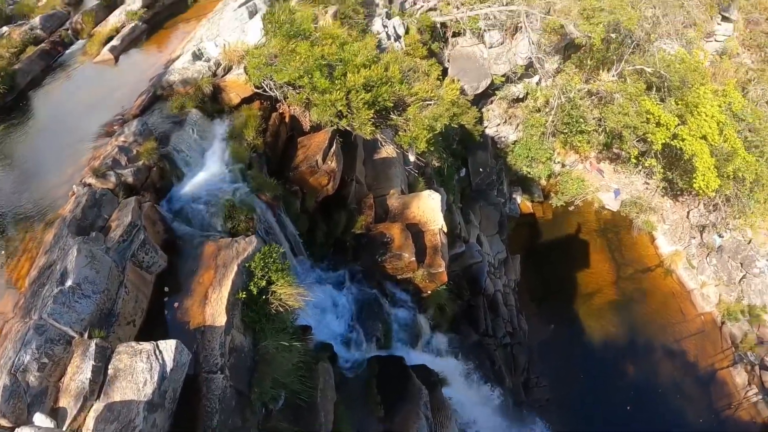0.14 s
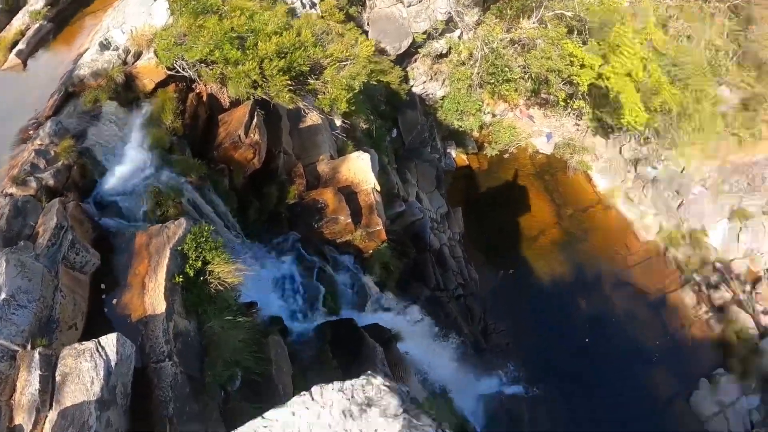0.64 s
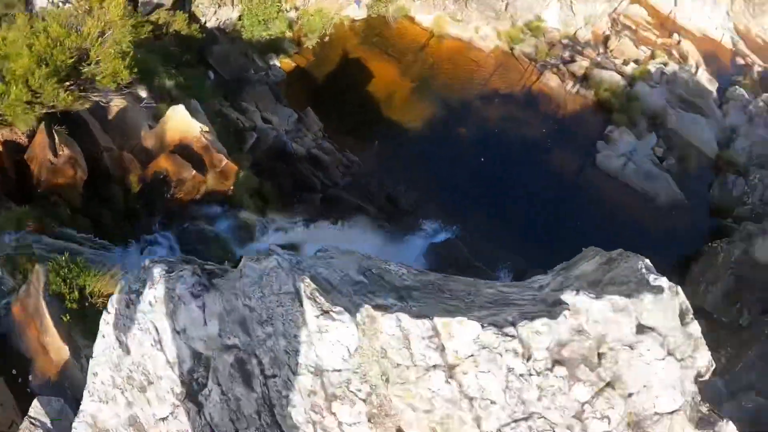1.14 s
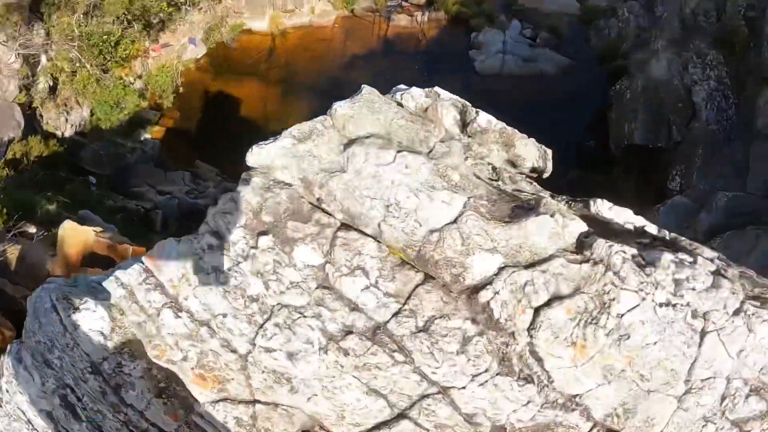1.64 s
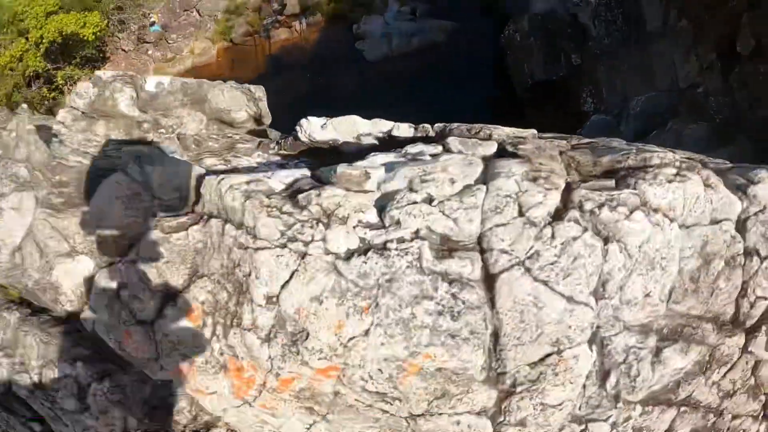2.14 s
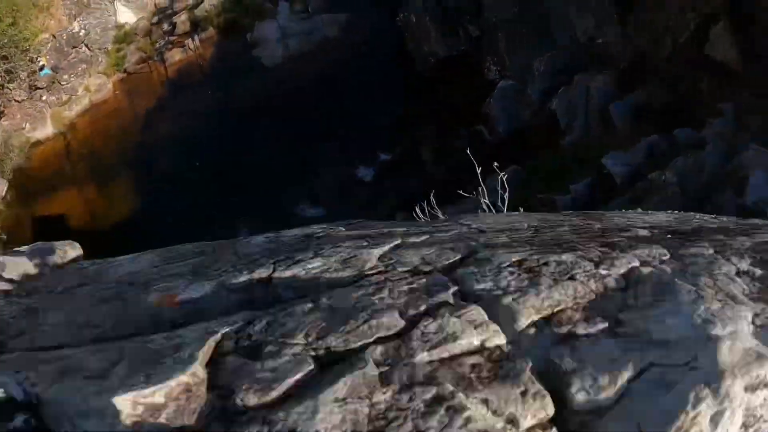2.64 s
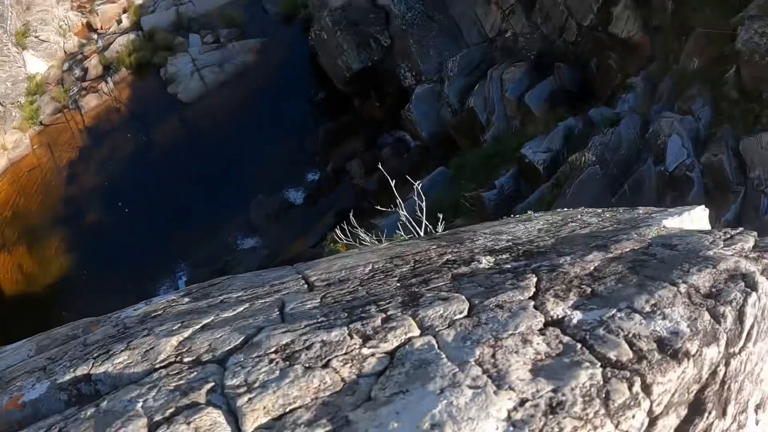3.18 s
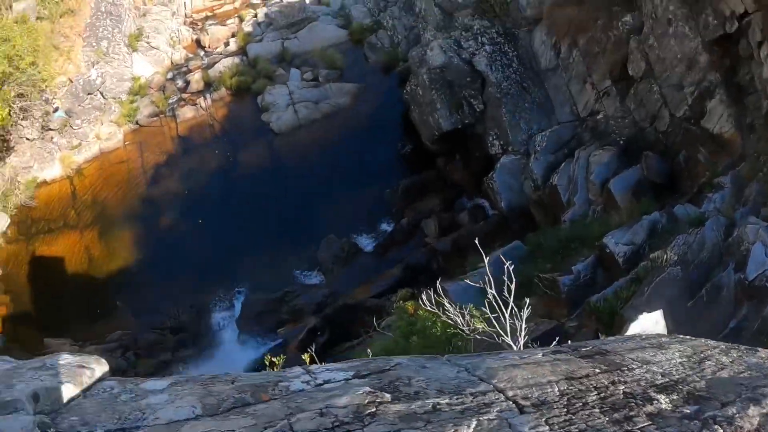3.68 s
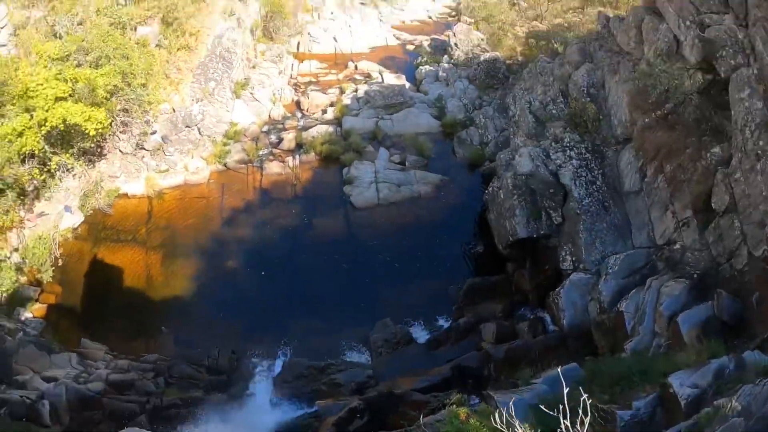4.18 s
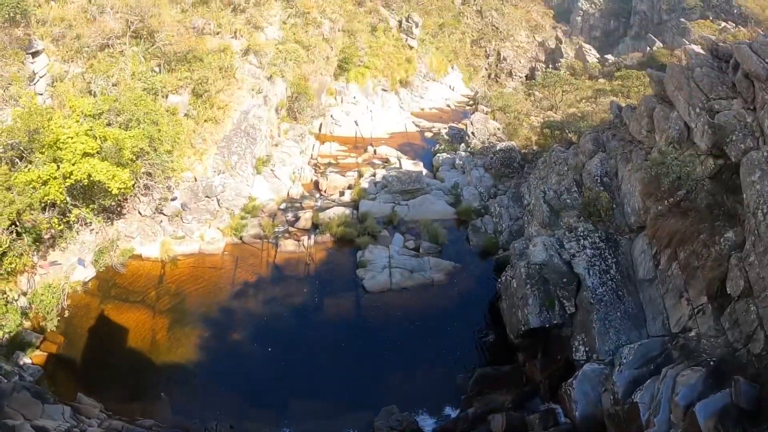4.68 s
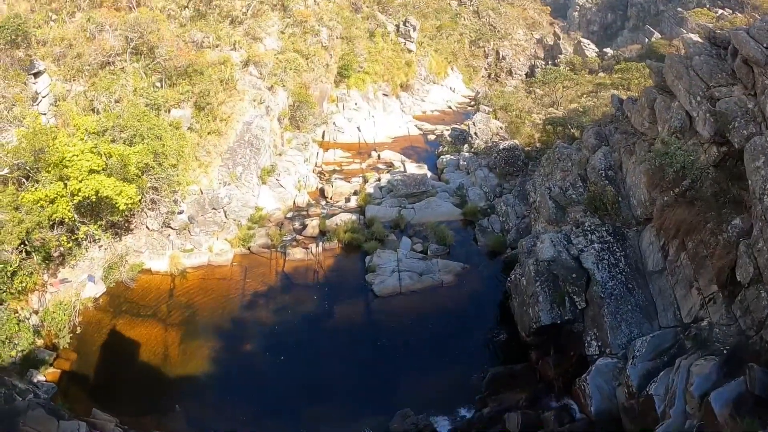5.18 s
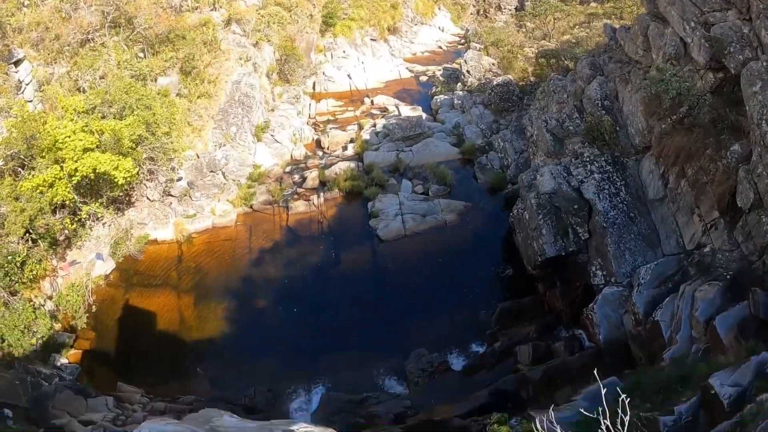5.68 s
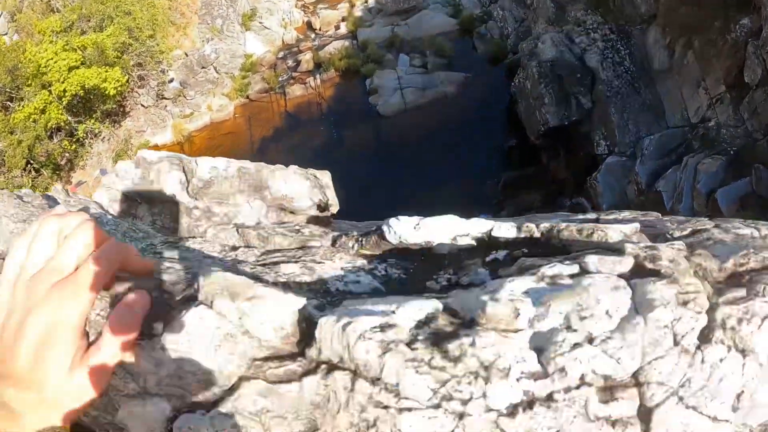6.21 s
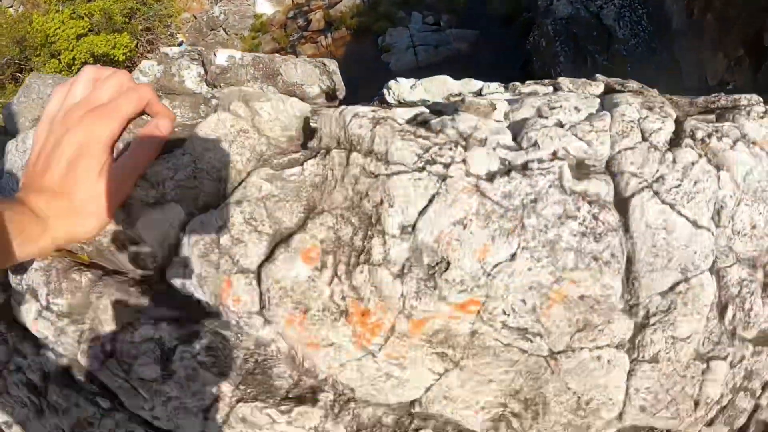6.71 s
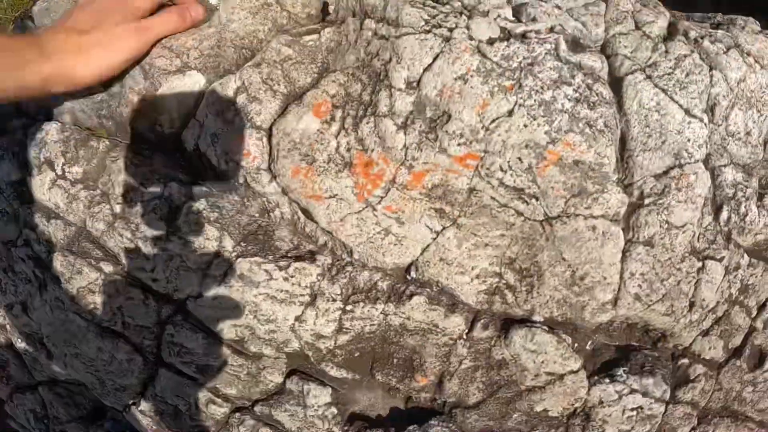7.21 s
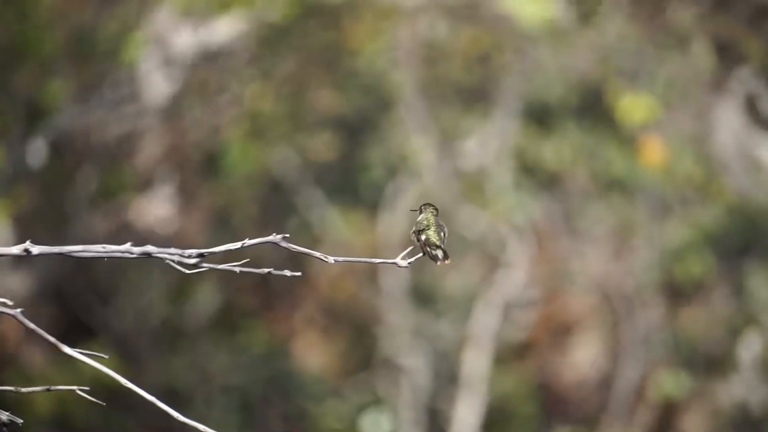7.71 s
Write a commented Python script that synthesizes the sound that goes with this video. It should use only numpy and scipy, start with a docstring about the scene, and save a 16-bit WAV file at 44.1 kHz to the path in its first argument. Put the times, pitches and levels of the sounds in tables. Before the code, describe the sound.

A waterfall hisses below a rock ledge while wind rumbles and a pole-mounted camera knocks on stone, then a cut to windy, rustling bushes.

```python
"""A waterfall hisses through the resonant microphone ports of a small camera swung on a pole along a
rock ledge: filtered noise in bands that surge together and flicker alone. Wind on the housing is low,
gusty noise; knocks of the pole on stone are fading tones with some crunching grit, and loud peaks duck
the gain. Then a hard cut: among bushes, leaf hiss and wind buffeting (both filtered noise) fade in at
another microphone, with short low pops of wind."""
import sys
import numpy as np
from scipy import signal
from scipy.fft import rfft, irfft
from scipy.io import wavfile
from scipy.ndimage import uniform_filter1d

SR = 44100
rng = np.random.default_rng(int(sys.argv[2]) if len(sys.argv) > 2 else 0)


def volts_from_decibels(level):
    """Turn decibel levels (scalar or array-like) into linear amplitude factors."""
    exponent = np.asarray(level, float) / 20
    return 10 ** exponent


def store_pcm(level_fs):
    """Save levels as 16-bit WAV."""
    pcm = np.round(np.clip(level_fs, -1, 1) * 32767).astype(np.int16)
    wavfile.write(sys.argv[1], SR, np.atleast_2d(pcm).T)


N = 345744
T = np.arange(N) / SR  # time of each sample [s]
FREQ = np.fft.rfftfreq(N, 1 / SR) + 1e-3  # frequency of each spectrum bin [Hz], kept above 0 for the log
CUT_S = 7.486  # the ledge ends and the bushes begin

# The hiss swells and sinks as the camera turns; after the hard blow at 5.14 s the gain sinks too:
# (time [s], hiss level before band tilt and flicker [dB])
FALLS_LEVEL = [(0, -36), (.29, -39), (.54, -41.5), (.95, -37), (1.25, -37.5), (1.53, -42), (2.0, -43.5),
               (2.4, -47.5), (2.9, -42.5), (3.3, -43.5), (3.8, -41), (4.05, -41.5), (4.45, -39.5),
               (4.76, -40.5), (5.12, -40.5), (5.2, -44), (5.45, -46), (5.76, -42), (6.05, -47),
               (7.44, -46.5)]
# Tone of the falls, left plus right, before the port peaks: (frequency [Hz], relative level [dB])
FALLS_MID_TONE = [(180, -42), (300, -6.5), (756, -15.5), (1560, -5.5), (2000, -9), (3230, -5.5),
                  (3510, -6.5), (3940, 1), (4350, -5), (4720, -2.5), (5130, -6.5), (6460, -10), (8140, -21),
                  (12100, -43), (15500, -57)]
# Tone of the falls, left minus right: (frequency [Hz], relative level [dB])
FALLS_SIDE_TONE = [(88, -49), (150, -14), (509, -9.5), (643, -16.5), (930, -2), (1270, -9), (2180, -0.5),
                   (3220, 1.5), (3980, -4), (5440, -12), (6470, -27.5), (7130, -57), (9360, -33),
                   (12800, -42), (15500, -69)]
SIDE_DB = -8  # strength of left minus right against left plus right
# Resonances of the microphone ports: (frequency [Hz], width [Hz], boost [dB])
PORT_PEAKS = [(1340, 110, 5.5), (1577, 96, 6.5), (3227, 360, 4.5), (4050, 430, 4.5), (4714, 270, 5.5),
              (5500, 390, 4), (6270, 590, 4)]
# What left minus right shares with the sum: (frequency [Hz], share [0-1], phase lead [rad])
PORT_LINK = [(170, .5, 0), (700, .1, -.3), (1100, .5, -.8), (1550, .55, -1.1), (1900, .1, -1.3),
             (2400, .85, -.6), (2900, .82, -1.4), (3400, .7, -.4), (3800, .3, -.5), (3950, .5, -3.3),
             (5400, .88, -3.1), (6900, 0, -3.1)]
# How each band follows the level and the view:
# (band centre [Hz], share of low wash [factor], share of spray [factor])
TILT_BANDS = [(554, 1.7, 0), (1100, 1.5, 0.65), (1590, 0.56, 0), (2600, 1.04, 0), (3870, 0, 0),
              (4840, 0.34, 1.35), (6360, 0, 1.38), (9700, 0.24, 0.62)]
# The low wash changes less than the hiss as the level leaves FACING_DB, by this share
FACING_DB, WASH_PER_DB = -41, 0.4857
# Open view of the spray: (time [s], boost before the band shares [dB])
SPRAY_VIEW = [(0, 1), (3.3, 1.5), (4.4, 5), (5.7, 3.5), (6.5, 0.8), (7.4, 0.5)]

# Wind on the housing: (time [s], rumble level before gusts [dB])
WIND_LEVEL = [(0, -39), (.2, -34), (.42, -42), (1.1, -39), (1.45, -39.5), (1.76, -36.5), (2.3, -37.5),
              (2.72, -27.5), (3.3, -34.5), (3.9, -32), (4.06, -36.5), (4.5, -33), (5.3, -38), (5.7, -43.5),
              (5.88, -38), (6.2, -41.5), (6.8, -39), (7.1, -40), (7.46, -40.5)]
# Tone of the wind rumble: (frequency [Hz], relative level [dB])
RUMBLE_TONE = [(8.8, -34.5), (15, 2), (27, 2.5), (41, 1), (57, -4.5), (81, -23.5), (130, -29), (170, -55),
               (290, -120)]
# Tone of the housing flutter: (frequency [Hz], relative level [dB])
FLUTTER_TONE = [(53, -39), (90, 0), (135, -6.5), (177, -6), (225, -7.5), (659, -32), (700, -25), (910, -38),
                (1540, -120)]
# Flutter level when the rumble is at BREEZE_DB, and the dB it gains per dB of rumble
FLUTTER_DB, BREEZE_DB, FLUTTER_PER_DB = -53.5, -39, .3
# The grip shifts on the pole and the housing flutters more:
# (time [s], spread to each side [s], flutter level before gusts [dB])
GRIP_SHIFTS = [(1.98, 0.28, -53), (4.5, 0.12, -46.5), (5.148, 0.097, -38), (6.05, 0.29, -47),
               (6.6, 0.19, -47), (7.3, 0.28, -48.5)]

# Blows on the stone, strengths before the contact softens them:
# (time [s], shell [dB], mount [dB], pole [dB], contact spread [ms])
KNOCKS = [(0.1264, -19.5, -24, -20, 0.27), (.156, -18, -9.5, -10.5, 0.23), (0.2319, -20, -12.5, -13, 0.51),
          (0.29, -47, -40, -41, 0.85), (.412, -37, -42, -26.5, 0.71), (2.021, -24, -34, -29, 0.41),
          (2.025, -22, -26.5, -17.5, 0.79), (5.0584, -34, -20, -22.5, 0.35), (5.085, -33, -35, -39, 0.19),
          (5.142, -2, -28.5, -17, 0.19), (5.16, -15.5, -11.5, -13, 0.11), (5.199, -20, -17.5, -14.5, 1),
          (5.296, -49, -37, -38, 0.64), (5.9308, -6.5, -21, -20, 0.53), (5.962, -32, -30.5, -27, 0.46),
          (6.5383, -13.5, -31, -29, 0.41), (6.554, -40, -27.5, -33, 0.23), (6.571, -33, -46, -38, 0.41),
          (6.879, -40.5, -45, -34, 0.85), (7.154, -34, -37, -35, .2), (7.166, -21.5, -55, -45, 0.42),
          (7.172, -19.5, -39, -38, 0.78), (7.196, -36, -36, -27, 0.23), (7.383, -40, -47, -48, 0.12)]
# Ringing tones of the shell: (frequency [Hz], relative level [dB], time to fall 60 dB [s])
SHELL_MODES = [(264.7, 6, 0.069), (463, -14, 0.023), (503, 3, 0.031), (804, -7.5, 0.02), (1060, -3, 0.036),
               (1237, -2.5, 0.026), (1570, -36, 0.023), (1990, -35, 0.014)]
# Ringing tones of the mount: (frequency [Hz], relative level [dB], time to fall 60 dB [s])
MOUNT_MODES = [(166.3, 1, 0.15), (103, -14, 0.08)]
# Ringing tones of the pole: (frequency [Hz], relative level [dB], time to fall 60 dB [s])
POLE_MODES = [(53.4, 3.5, 0.16), (39.3, -14.5, 0.23), (79.7, -12, 0.34)]
# Some blows land on loose grit: (time [s], crunch level [dB], centre frequency [Hz])
CRUNCHES = [(.1269, -45, 900), (.152, -33, 1050), (2.021, -45, 1100), (5.0586, -43, 800), (5.086, -47, 700),
            (5.142, -23.5, 1340), (5.16, -41, 1200), (5.9316, -35.5, 1500), (6.5384, -43, 1200),
            (7.196, -39, 1100)]
# The pole rebounds once in the hand, slow and deep
HEAVE_S, HEAVE_HZ, HEAVE_DB, HEAVE_T60_S = 5.9455, 33, -7, 0.16
TICK_S, TICK_DB = 3.144, -20.5  # one buckling tick, its level added to that of the tones below
# Ringing tones of the tick: (frequency [Hz], relative level [dB], time to fall 60 dB [s])
BUCKLE_MODES = [(516, -1.5, 0.015), (1136, 1.5, 0.029), (1250, 4.5, 0.021)]

# Tone of the wind buffeting in the bushes: (frequency [Hz], relative level [dB])
BUFFET_TONE = [(24, -73), (40, -56), (64, -14), (90, -11), (172, 4.5), (322, -2.5), (609, -10), (900, -17),
               (1170, -42), (1980, -120)]
# Tone of the leaf hiss: (frequency [Hz], relative level [dB])
LEAF_TONE = [(410, -22), (700, -11.5), (1040, -0.5), (1310, -4), (2020, -6.5), (2190, -7.5), (8210, -12.5),
             (10400, -13), (16000, -21)]
# Which side the leaf hiss leans to: (frequency [Hz], left over right [dB])
LEAF_LEAN = [(60, -3), (110, 1.0), (200, -3), (380, -3), (700, -5), (1290, -5), (2380, -5), (4400, -2.5),
             (8120, 0), (15000, -1)]
# Eddies on both microphone capsules: (time [s], peak of the swing's outline [dB], frequency [Hz])
POPS = [(7.56, -40, 700), (7.564, -35, 250), (7.596, -28.5, 330), (7.615, -34, 220), (7.74, -19, 220),
        (7.799, -21, 300), (7.82, -9.5, 425), (7.831, -13, 300)]
# Buffeting and leaves rise along a power law of time: levels reached FADE_S after the cut;
# a constant faint hiss of still air lies under them
FADE_S, BUFFET_DB, LEAVES_DB, STILL_DB = 0.36, -21, -24.5, -72
BUFFET_DB_PER_DECADE, LEAVES_DB_PER_DECADE = 59, 52.5  # rise for each tenfold time since the cut


def curves(table):
    """Columns of a table after the first, drawn out to one value a sample."""
    s, *columns = np.transpose(table)
    return [np.interp(T, s, c) for c in columns]


def colour(points):
    """Gain at each frequency, joined up from (frequency [Hz], level [dB]) points."""
    hz, db = np.transpose(points)
    return volts_from_decibels(np.interp(np.log(FREQ), np.log(hz), db))


def unit(x):
    """Scale to an average (rms) strength of 1."""
    return x / np.sqrt(np.mean(x ** 2))


def white():
    """Spectrum of fresh white noise, equally strong at all pitches."""
    return rfft(rng.standard_normal(N))


def walk(rate):
    """Random levels held for 1 / rate seconds, smoothed twice and scaled to rms 1."""
    hold = int(SR / rate)
    steps = np.repeat(rng.standard_normal(N // 200), hold)[:N]
    return unit(uniform_filter1d(uniform_filter1d(steps, hold), hold))


def ring(t, modes, rise_s=1e-4):
    """Fading tones set off at t = 0; the swing builds up over about rise_s."""
    t = np.maximum(t, 0)
    swing = sum(volts_from_decibels(db - 60 * t / t60) * np.sin(2 * np.pi * hz * t) for hz, db, t60 in modes)
    return swing * (1 - np.exp(-(t / rise_s) ** 2))


def stereo(mid, side):
    """Left and right from their sum and difference."""
    return np.array([mid + side, mid - side])


def falls():
    """Countless bursting bubbles blur into hiss; its bands surge together and flicker alone."""
    level_db, = curves(FALLS_LEVEL)
    spray_db, = curves(SPRAY_VIEW)
    wash_db = WASH_PER_DB * (FACING_DB - level_db)
    ports = volts_from_decibels(sum(db / (1 + ((FREQ - hz) / width * 2) ** 2) for hz, width, db in PORT_PEAKS))
    noise = white()
    mid = noise * colour(FALLS_MID_TONE) * ports

    # the difference between the ports is part shared noise, part its own
    hz, share, lead = np.transpose(PORT_LINK)
    share = np.clip(np.interp(FREQ, hz, share), 0, 1)
    shared = share * np.exp(1j * np.interp(FREQ, hz, lead)) * noise
    own = np.sqrt(1 - share ** 2) * white()
    side = (shared + own) * colour(FALLS_SIDE_TONE)
    side *= volts_from_decibels(SIDE_DB) * np.linalg.norm(mid) / np.linalg.norm(side)

    scale = 1 / np.std(irfft(mid, N))
    place = np.interp(FREQ, np.transpose(TILT_BANDS)[0], np.arange(len(TILT_BANDS)))
    surge = walk(7)
    out = 0
    for k, (_, wash, spray) in enumerate(TILT_BANDS):
        band = np.clip(1 - abs(place - k), 0, 1)  # overlapping bands that add up to the whole
        # as the hiss sinks, the spray dulls and the low wash of the gorge is left
        tilt_db = wash * wash_db + spray * spray_db
        gain = volts_from_decibels(level_db + tilt_db + 0.5 * surge + 0.5 * walk(12))
        out = out + gain * scale * stereo(irfft(mid * band, N), irfft(side * band, N))
    return out


def wind():
    """Eddies push the whole housing, so both ports move almost alike, the left one a little more."""
    rumble_db, = curves(WIND_LEVEL)
    grips = sum(volts_from_decibels(db) * np.exp(-((T - s) / spread) ** 2) for s, spread, db in GRIP_SHIFTS)
    breeze = volts_from_decibels(FLUTTER_DB + FLUTTER_PER_DB * (rumble_db - BREEZE_DB))
    flutter_gain = np.hypot(breeze, grips)
    gust = walk(14)

    def rumbling():
        """Deep noise that swells with the gusts."""
        return unit(irfft(white() * colour(RUMBLE_TONE), N)) * volts_from_decibels(rumble_db + 2.05 * gust)

    def fluttering():
        """Higher noise that follows the gusts less and also trembles by itself."""
        trembling = volts_from_decibels(1.08 * gust + 2.4 * walk(30))
        return unit(irfft(white() * colour(FLUTTER_TONE), N)) * flutter_gain * trembling

    mid = rumbling() + fluttering()
    side = 0.025 * mid + volts_from_decibels(-29) * rumbling() + volts_from_decibels(-23) * fluttering()
    return stereo(mid, side)


def knocks():
    """Each blow rings shell, mount and pole; a softer contact pushes longer and leaves out high tones."""
    out = np.zeros(N + SR)
    span = np.arange(-SR // 100, SR // 3)  # samples around a blow
    for s, shell_db, mount_db, pole_db, contact_ms in KNOCKS:
        at = int(s * SR) + span
        t = at / SR - s
        body = volts_from_decibels(mount_db) * ring(t, MOUNT_MODES)
        # the pole swings back against the blow, a moment late
        body -= volts_from_decibels(pole_db) * ring(t - 0.002, POLE_MODES)
        # the shell first gives way a little, then springs out
        body -= volts_from_decibels(shell_db) * ring(t + 0.0015, SHELL_MODES, rise_s=0.0022)
        push_ms = np.arange(-200, 201) / SR * 1000
        push = np.exp(-0.5 * (push_ms / contact_ms) ** 2)
        out[at] += signal.fftconvolve(body, push / push.sum(), "same")

    for s, grit_db, hz in CRUNCHES:
        at = int(s * SR) + span
        t = at / SR - s
        grain_filter = signal.butter(3, [0.56 * hz, 1.38 * hz], "bandpass", fs=SR, output="sos")
        grit = unit(signal.sosfilt(grain_filter, rng.standard_normal(len(span))))
        # grit crunches under the contact just before the shell answers
        onset = np.clip(t / 0.0018 + 1.24, 0, 1) ** 2
        out[at] += onset * volts_from_decibels(grit_db - 60 * t / 0.071) * grit

    mid = out[:N] + ring(T - HEAVE_S, [(HEAVE_HZ, HEAVE_DB, HEAVE_T60_S)], rise_s=0.011)
    # the shell flexes between the ports: the left one leads, most around 900 Hz
    side = irfft(rfft(mid) * 1j * FREQ / 1500 / (1 + (FREQ / 900) ** 2), N)
    tick = volts_from_decibels(TICK_DB) * ring(T - TICK_S, BUCKLE_MODES, rise_s=0.0017)
    return stereo(mid + tick, side - 0.38 * tick)  # the tick is louder on the right


def gain_control(x, top_db=-9, depth=0.52, release_s=0.037):
    """Peaks over top_db quickly pull the gain down by depth dB per dB; it creeps back over release_s."""
    block = 32  # samples
    loudest = abs(x).max(0)[:N // block * block].reshape(-1, block).max(1)
    peak_db = 20 * np.log10(loudest + 1e-9)
    over_db = np.maximum(peak_db - top_db, 0)
    held_db = 0.0
    for i in range(len(over_db)):
        held_db = max(over_db[i], held_db * np.exp(-block / SR / release_s))
        over_db[i] = held_db
    block_ends = (np.arange(len(over_db)) + 1) * block
    smooth_db = np.interp(np.arange(N), block_ends, uniform_filter1d(over_db, size=3))
    return x * volts_from_decibels(-depth * smooth_db)


def bushes():
    """Wind pounds both capsules with partly shared noise in separate puffs, and short pops on both sides.

    A wide, smooth leaf hiss fades in along with the buffeting."""
    decades = np.log10(np.maximum(T - CUT_S, 1e-3) / FADE_S)
    common = white()
    # an eddy passes one capsule after the other: a phase shift of 1.5 rad in the shared noise
    pair = (common + 0.7 * white(), common * np.exp(1.5j) + 0.7 * white())
    buffet = np.array([unit(irfft(c * colour(BUFFET_TONE), N)) * volts_from_decibels(1.8 * walk(40)) for c in pair])
    buffet_gain = volts_from_decibels(BUFFET_DB + BUFFET_DB_PER_DECADE * decades)

    lean = np.sqrt(colour(LEAF_LEAN))
    leaves = unit(np.array([irfft(white() * colour(LEAF_TONE) * g, N) for g in (lean, 1 / lean)]))
    leaves_gain = volts_from_decibels(LEAVES_DB + LEAVES_DB_PER_DECADE * decades) + volts_from_decibels(STILL_DB)

    pops = 0
    turn = np.array([[np.pi], [np.pi / 2]])  # the swing of a pop differs by a quarter turn left to right
    for s, db, hz in POPS:
        outline = volts_from_decibels(db) * np.exp(-((T - s) * hz * 2.1) ** 2)
        pops = pops + outline * np.cos(2 * np.pi * hz * (T - s) + turn)
    return buffet * buffet_gain + leaves * leaves_gain + pops


def scene():
    """The ledge until the cut, then the bushes."""
    ledge = gain_control(falls() + wind() + knocks())
    return np.where(T < CUT_S, ledge, bushes())


def low_pass(x):
    """Removes everything above the highest recorded frequency."""
    return signal.sosfilt(signal.butter(12, 16580, fs=SR, output="sos"), x)


def record(dry):
    """A steep filter cuts off the treble above 15700 Hz."""
    treble_cut = signal.ellip(8, 0.2, 70, 15700, fs=SR, output="sos")
    mix = signal.sosfilt(treble_cut, dry)
    return low_pass(mix)


dry = scene()
out = record(dry)
store_pcm(out)
```